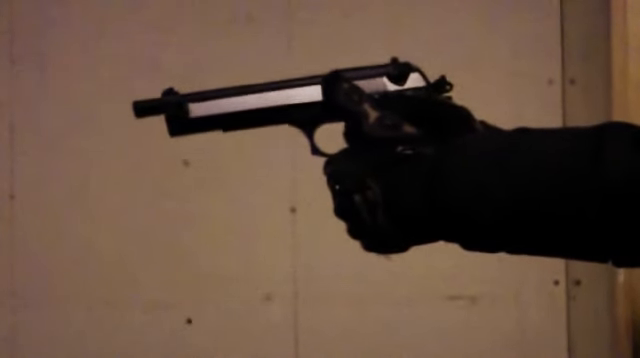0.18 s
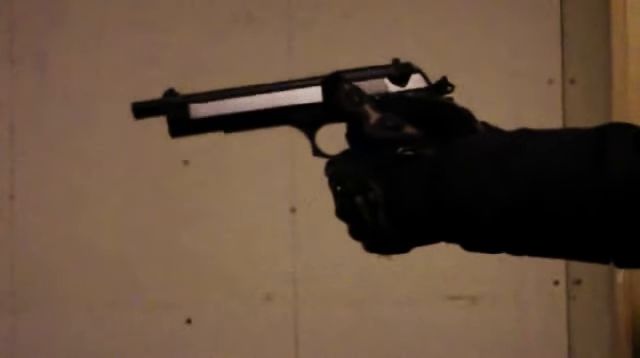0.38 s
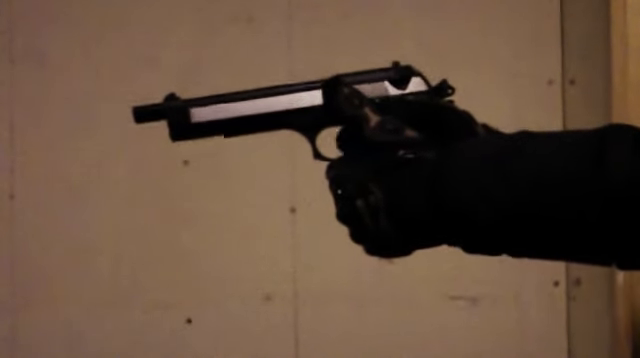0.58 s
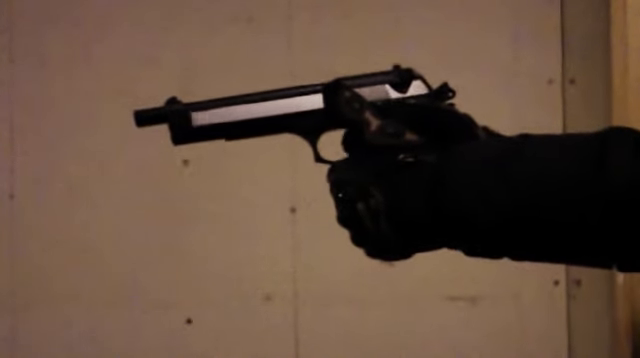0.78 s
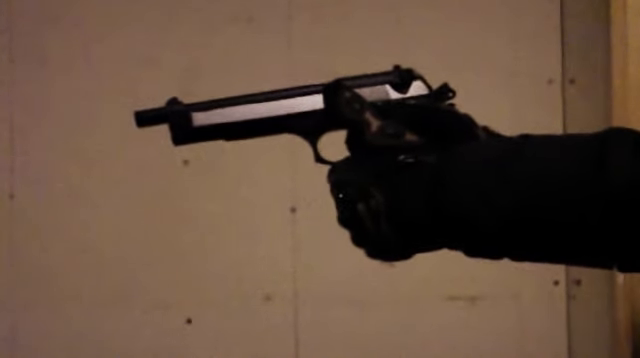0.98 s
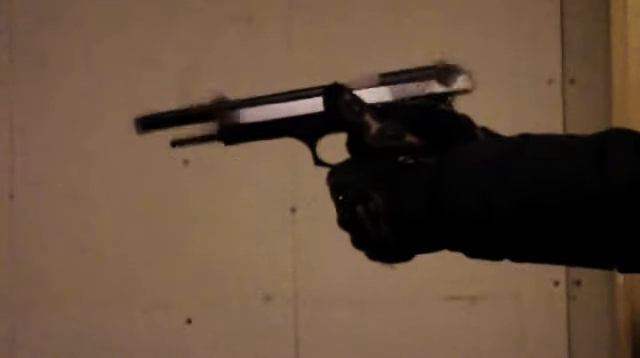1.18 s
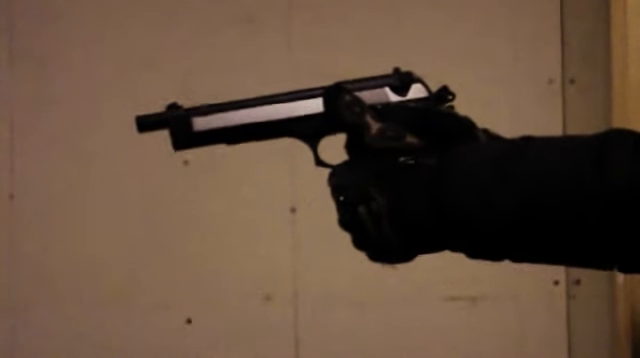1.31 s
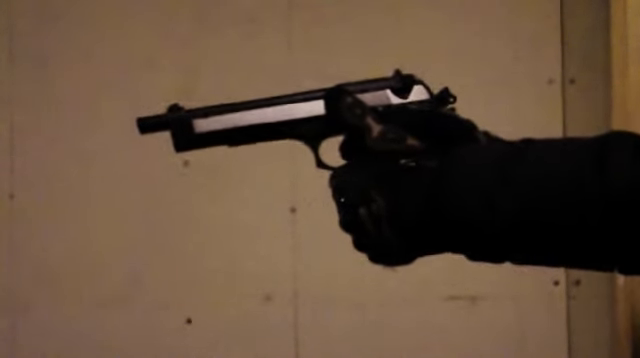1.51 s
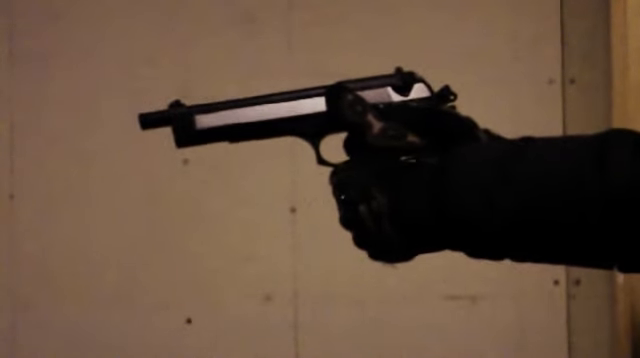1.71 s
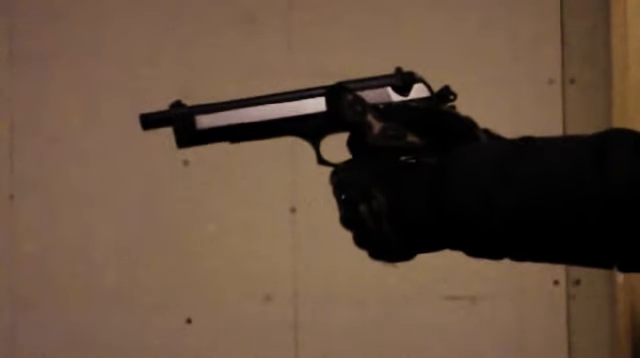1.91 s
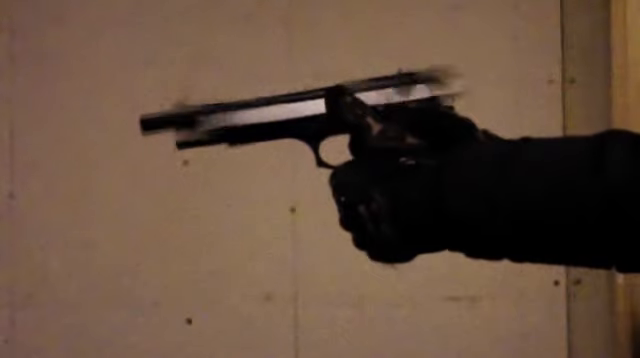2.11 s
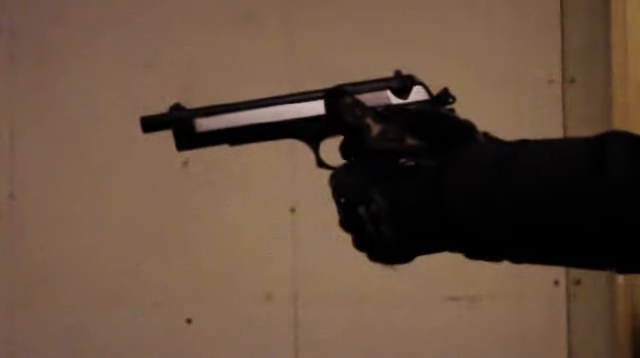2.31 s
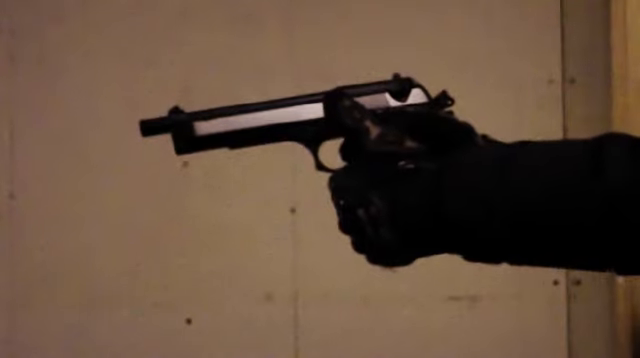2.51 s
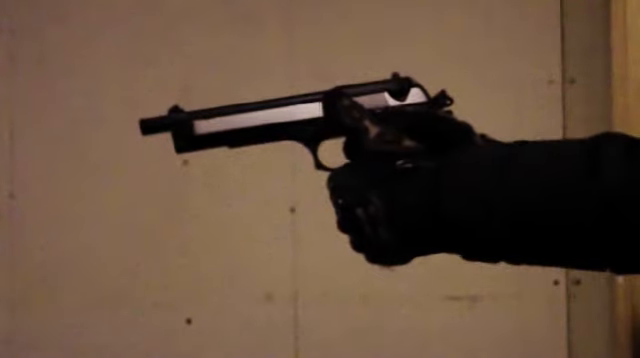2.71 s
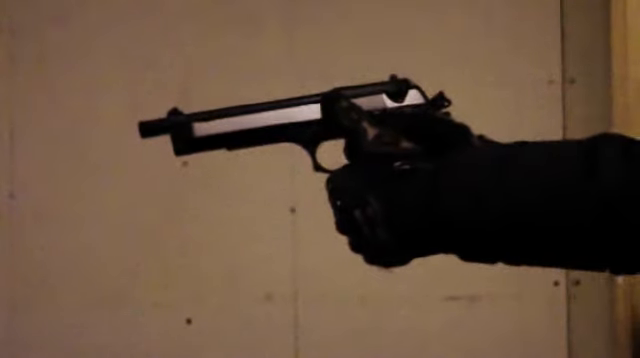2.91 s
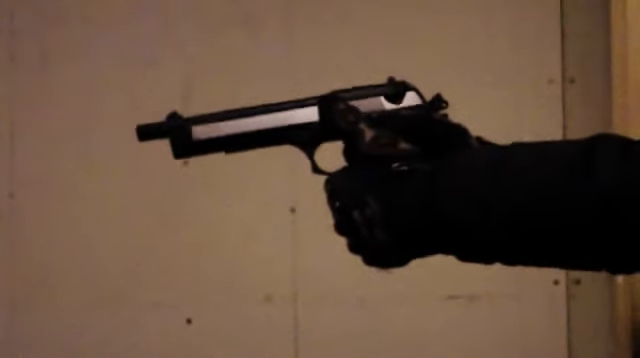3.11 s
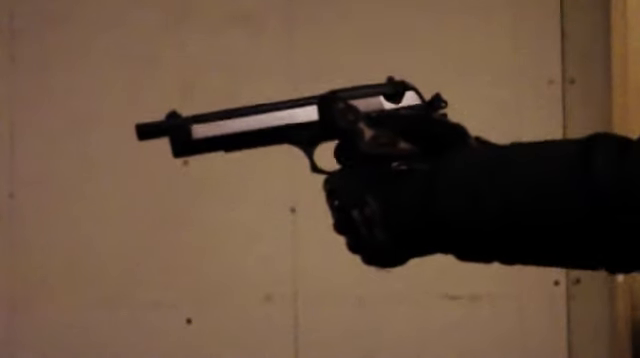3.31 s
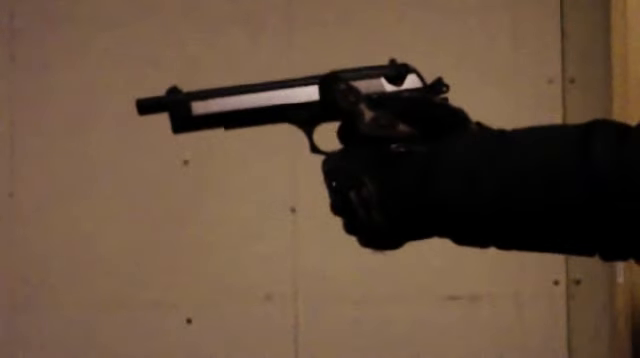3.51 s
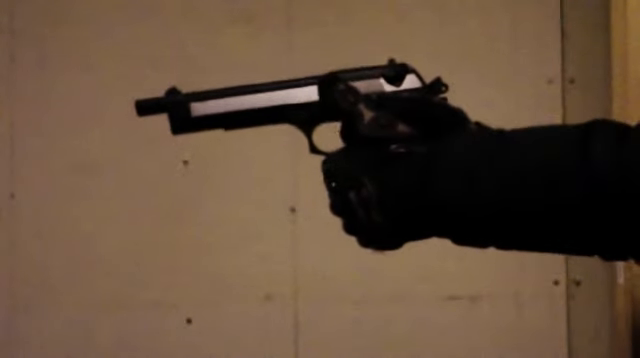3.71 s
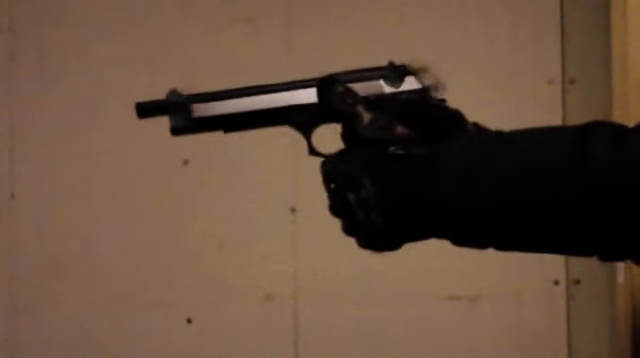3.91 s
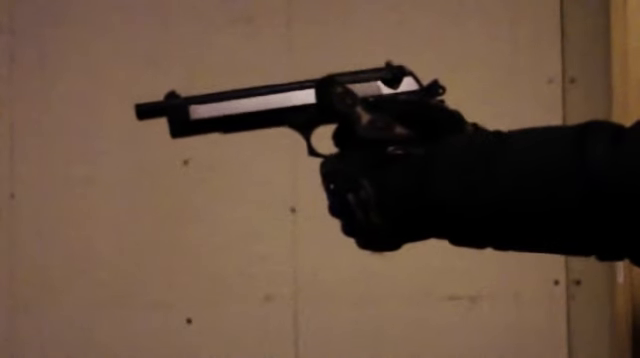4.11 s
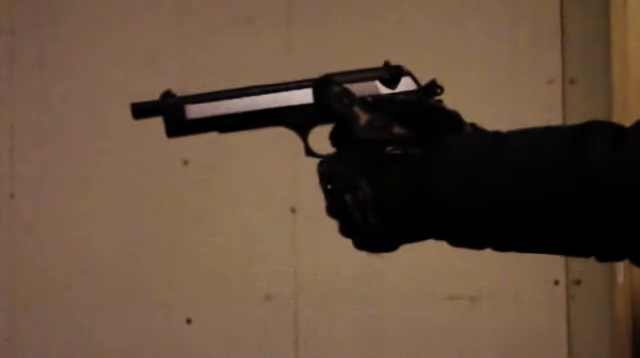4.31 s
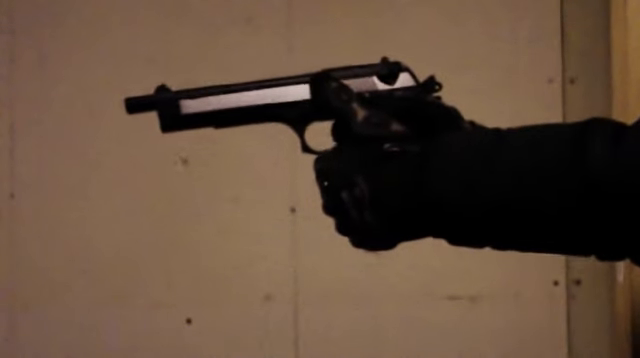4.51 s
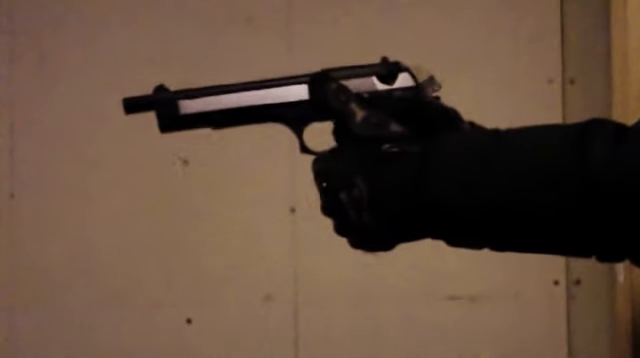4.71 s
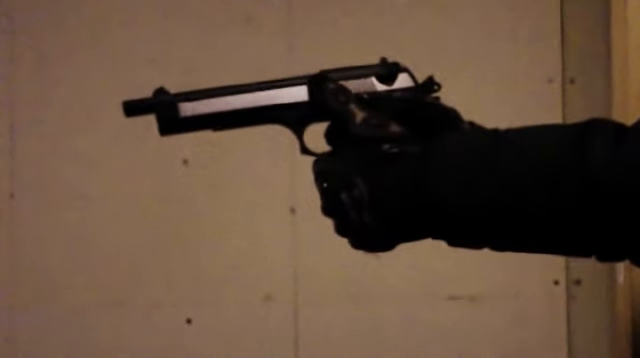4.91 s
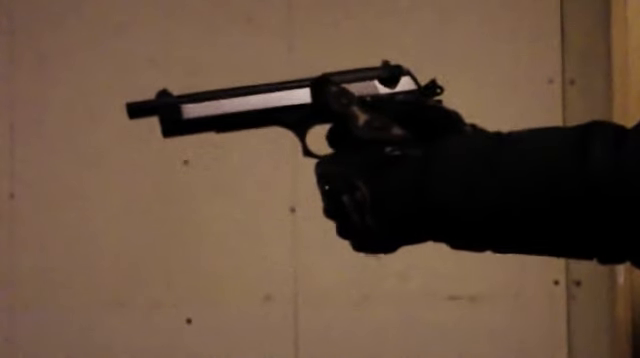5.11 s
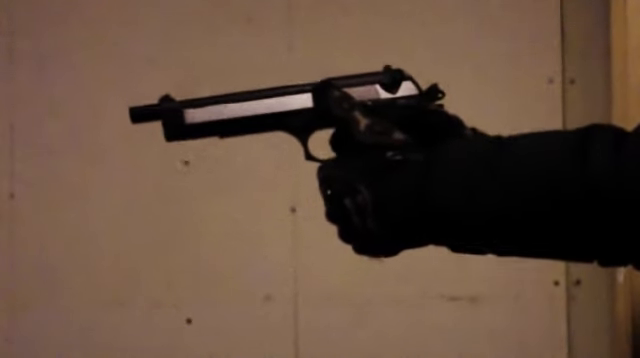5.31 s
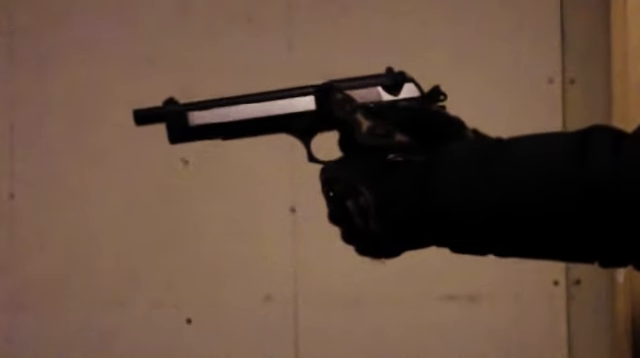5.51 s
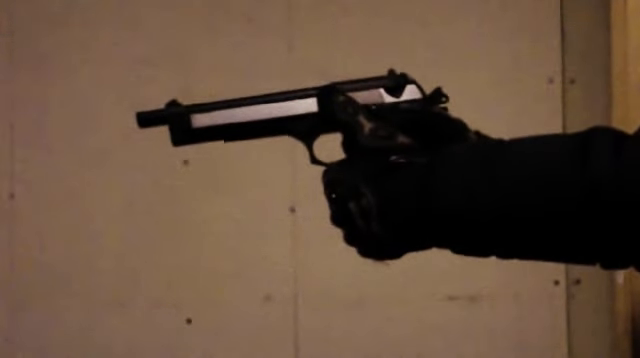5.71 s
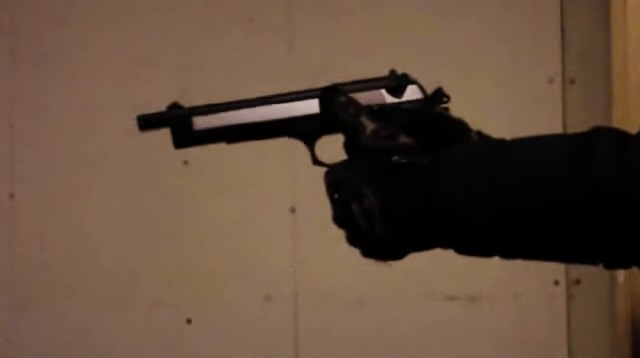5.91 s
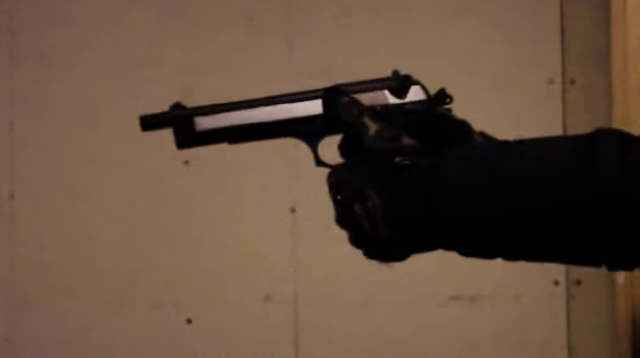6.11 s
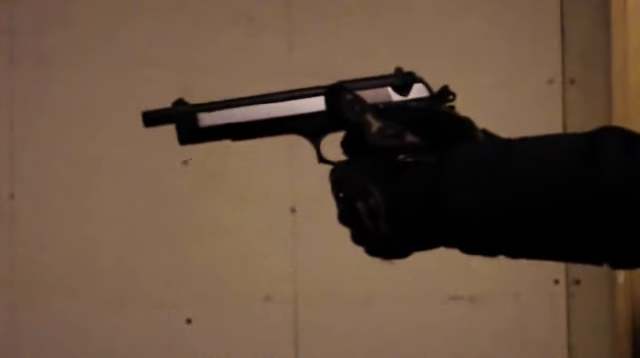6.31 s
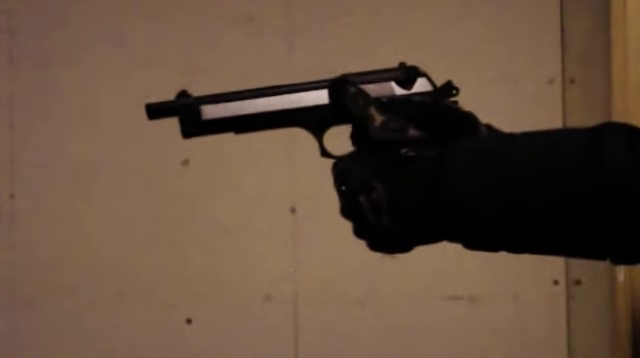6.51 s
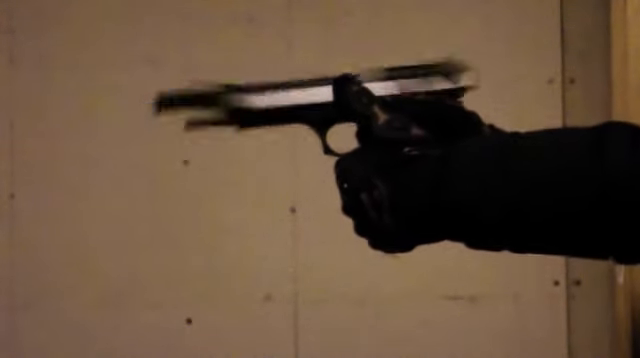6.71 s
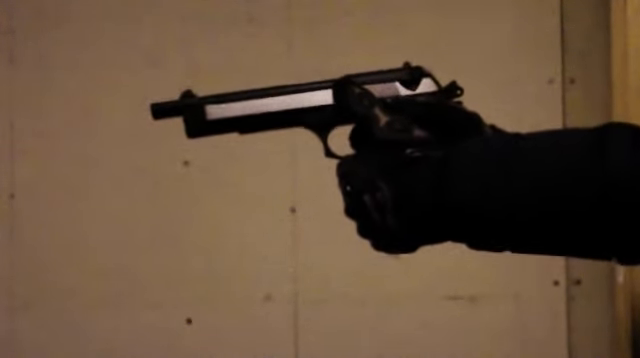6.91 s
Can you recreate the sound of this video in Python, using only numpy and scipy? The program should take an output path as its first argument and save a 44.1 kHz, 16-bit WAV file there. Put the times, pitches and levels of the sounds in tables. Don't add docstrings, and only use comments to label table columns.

```python
import sys
import numpy as np
from scipy import signal
from scipy.fft import rfft, irfft, next_fast_len
from scipy.io import wavfile
from scipy.ndimage import uniform_filter1d, map_coordinates

SR = 44100
rng = np.random.default_rng(int(sys.argv[2]) if len(sys.argv) > 2 else 0)


def how_loud(loudness_db):
    steps = np.asarray(loudness_db, float) / 20
    return 10 ** steps


def dump(signal):
    limited = np.clip(np.atleast_2d(signal).T, -1, 1)
    pcm = np.round(limited * 32767).astype(np.int16)
    wavfile.write(sys.argv[1], SR, pcm)


N = 307818


def unit(x):
    return x / np.sqrt(np.mean(x ** 2) + 1e-20)


def along(points, hz):
    point_hz, value = np.transpose(points)
    return np.interp(np.log(hz + 1), np.log(point_hz + 1), value)


def filtered(x, response):
    m = next_fast_len(len(x) + 8192)
    return irfft(rfft(x, m) * response(np.fft.rfftfreq(m, 1 / SR)), m)[:len(x)]


def noise(spectrum, count):
    white = rng.standard_normal(count)
    return unit(filtered(white, lambda hz: how_loud(along(spectrum, hz))))


def add(track, s, sound):
    part = track[max(round(s * SR), 0):][:len(sound)]
    part += sound[:len(part)]


def swelling_mode(t, hz, db, t60, swell):
    shape = how_loud(db - 60 * t / t60) * (1 - np.exp(-(t / swell) ** 2))
    return shape * np.sin(2 * np.pi * (hz * t + rng.random()))


# start_s, level_db
TRAFFIC = [
    (0, -70),
    (2.9, -70),
    (3.6, -60),
    (4.7, -57),
    (5.8, -61),
    (6.3, -64),
    (6.55, -51),
    (6.98, -55),
]
# pitch_hz, level_db per Hz
DRONE = [(25, -30), (38, -2), (55, 0), (64, -10), (80, -50)]


def far_engine():
    level_db = np.interp(np.arange(N) / SR, *np.transpose(TRAFFIC))
    return how_loud(level_db) * noise(DRONE, count=N)


def shot_times():
    return [-.45] + [row[0] for row in SHOTS]


# pitch_hz, level_db per Hz
RUMBLE = [(5.9, -33), (10, 3.5), (26, 4.5), (54, -9.5), (67, -14.5), (81, -30.5), (110, -25), (140, -61.5),
          (240, -120)]
RUMBLE_DB, RUMBLE_SWING_DB, RUMBLE_JOLT_DB, JOLT_S = -57, 1.5, 5, .2


def building_rumble():
    t = np.arange(SR * 3 // 2) / SR
    jolt = np.zeros(N + SR)
    for s in shot_times():
        add(jolt, 1 + s, t / JOLT_S * np.exp(1 - t / JOLT_S))
    wander = map_coordinates(rng.standard_normal(size=40), [np.arange(N) / SR * 5.5])
    level_db = RUMBLE_DB + RUMBLE_SWING_DB * wander + RUMBLE_JOLT_DB * jolt[SR:]
    return how_loud(level_db) * noise(RUMBLE, count=N)


# pitch_hz, level_db, t60_s, swell_s
STAND = [(9.5, -45, 1.6, .05), (19.5, -38, 2.2, .12), (33, -34, 1.0, .14)]


def stand():
    t = np.arange(SR * 3 // 2) / SR
    sway = np.zeros(N + SR)
    for s in shot_times():
        for hz, db, t60, swell in STAND:
            add(sway, 1 + s, swelling_mode(t, hz, db, t60, swell))
    return sway[SR:]


# pitch_hz, level_db per Hz
HISS = [(41, -28.5), (70, -4.5), (92, -17), (130, -13), (205, -17), (476, -21.5), (554, -17), (701, -25),
        (2020, -24), (3590, -35), (3900, -50), (5070, -100.5), (8580, -120)]


def preamp_hiss():
    return how_loud(-60) * noise(HISS, count=N)


# multiple of its turning rate, level_db
WHIRR = [(1, -5.5), (2, 2.5), (3, -3), (4, 0), (5, 0.5), (6, -20.5), (7, -2.5), (8, -2.5), (9, -8),
         (10, -32)]
SEEK_DB = [
    -63.5,
    -59.5,
    -70,
    -61.5,
    -62,
    -65,
    -70,
    -66,
    -61.5,
    -61,
]
SEEK_FIRST_S, SEEK_EVERY_S = .088, .6865


def storage_motor():
    out = np.zeros(N)
    t = np.arange(round(.105 * SR)) / SR
    gate = np.clip(np.minimum(t, t[-1] - t) / 0.014, 0, 1)
    for burst, db in enumerate(SEEK_DB):
        unsteady = unit(uniform_filter1d(rng.standard_normal(len(t)), size=700))
        turns = np.cumsum(378 + 4 * unsteady) / SR
        buzz = sum(how_loud(level) * np.sin(2 * np.pi * (k * turns + rng.random())) for k, level in WHIRR)
        whirr = unit(buzz) + 0.83 * noise(CLACK, count=len(t))
        add(out, SEEK_FIRST_S + burst * SEEK_EVERY_S, how_loud(db) * gate * whirr)
    return out


# pitch_hz, t60_s
ROOM = [(100, 0.58), (500, 0.28), (1500, 0.29), (3500, 0.32)]


def room(x, wet_db, far_db):
    hz, t, z = signal.stft(rng.standard_normal(SR * 3 // 4), SR, nperseg=256)
    near_fall = how_loud(-60 * t / along(ROOM, hz)[:, None])
    far_fall = how_loud(far_db - 60 * t / 1.1)
    tail = signal.istft(z * (near_fall + far_fall), SR, nperseg=256)[1]
    delayed = np.pad(x, (round(.004 * SR), 0))
    wet = signal.fftconvolve(delayed, tail / np.linalg.norm(tail))
    return np.pad(x, (0, len(wet) - len(x))) + how_loud(wet_db) * wet


# pitch_hz, level_db per Hz
CLACK = [(150, -27), (500, -9.5), (800, -4.5), (1100, -9.5), (1500, -11), (1880, -3.5), (2200, -2.5),
         (2600, -2.5), (3100, -11), (3800, -17)]
# pitch_hz, width_hz, lift_db
SLIDE = [(1220, 60, 5), (1640, 40, 5), (1880, 45, 7), (2200, 45, 8), (2465, 35, 7), (2700, 45, 6)]


def clatter(db, t60, rise, spectrum=CLACK, metal=1):
    t = np.arange(SR // 5) / SR
    grain = how_loud(1.4 * unit(uniform_filter1d(rng.standard_normal(len(t)), size=60)))
    attack = np.clip(t / max(rise, 1e-4), 0, 1) ** 2
    decay = how_loud(-60 * np.maximum(t - rise, 0) / max(t60, .005))

    def lift(hz):
        peaks = [lift_db / (1 + (2 * (hz - c) / width) ** 2) for c, width, lift_db in SLIDE]
        return how_loud(metal * sum(peaks))

    burst = unit(filtered(grain * noise(spectrum, count=len(t)), lift))
    return how_loud(db) * attack * decay * burst


# pitch_hz, level_db per Hz
TICK = [(200, -30), (600, -12), (1200, -12.5), (1800, -4.5), (2300, 2), (2900, -3.5), (3500, -9),
        (3900, -13.5), (4500, -38)]
# pitch_hz, level_db per Hz
THUD = [(100, -29), (200, -13), (400, -7.5), (650, -1), (1000, -12.5), (1600, -30.5), (4000, -79.5)]
# start_s, level_db (peak), thud_db (over the peak)
PELLETS = [(0.0024, -37.5, -7), (0.0915, -41, -9.5), (0.598, -29, -9), (1.8632, -30.5, -6),
           (2.6364, -55, -2), (3.015, -40, -1.5), (3.0494, -47.5, -9), (3.4563, -23.5, -14),
           (3.4776, -34.5, -10), (3.6709, -27, -7.5), (4.336, -33, -15.5), (4.3694, -39.5, -11.5),
           (4.4097, -47, -6), (4.5992, -37.5, -11)]
RATTLE_T60_S, RATTLE_S_PER_DB = .07, .004


def pellets():
    out = np.zeros(N)
    for s, db, thud_db in PELLETS:
        t60 = RATTLE_T60_S + RATTLE_S_PER_DB * max(-25 - db, 0)
        tick = clatter(db - 9, t60, rise=0.0045, spectrum=TICK, metal=0)
        knock = clatter(db + thud_db - 6.5, t60, rise=.006, spectrum=THUD, metal=0)
        add(out, s - .003, room(tick + knock, wet_db=-2.5, far_db=-29))
    return out


# pitch_hz, level_db, t60_s, swell_s
BOARD = [(125, -34, .1, .003), (172, -23.5, .11, .004), (327, -15.5, .15, .027), (377, -11.5, .17, .027)]


def panels(db):
    t = np.arange(SR // 4) / SR
    return sum(swelling_mode(t, hz, db + level_db, t60, swell) for hz, level_db, t60, swell in BOARD)


# pitch_hz, level_db, t60_s, swing direction
FRAME = [(90, -20, .08, 1), (172, -14, .09, 1), (300, -6, .04, 1), (327, -14, .09, 1), (377, -11, .13, 1),
         (451, -16, .08, -1), (562, 0, .095, -1), (638, 0, .095, -1), (770, -18, .08, 1),
         (833, -14, .07, 1), (1150, -20, .05, -1)]


def ring(db, spread_db):
    t = np.arange(SR // 5) / SR
    modes = 0
    for hz, level, t60, way in FRAME:
        level_db = level + spread_db * rng.normal() - 60 * t / t60
        modes = modes + how_loud(level_db) * np.sign(way) * np.sin(2 * np.pi * hz * t)
    return how_loud(db) * modes * (1 - np.exp(-t / 0.0015))


# pitch_hz, level_db per Hz
LEAD_IN = [(500, -37), (1300, -14), (1900, 0), (2400, -3), (3000, -19), (4000, -51.5)]
# start_s (slide at its rear stop), crack_db, hiss_t60_s, slam_db, homing_db
SHOTS = [
    (.4546, -5.5, .045, -3.5, -12),
    (1.3461, -5, .04, -4, -12.5),
    (2.2939, -5.5, .04, -2.5, -9.5),
    (3.1891, -7.5, .075, -2, -17),
    (4.1316, -4.5, .07, -2.5, -9.5),
    (4.9399, -6, .045, -1.5, -8),
    (5.9735, -8, .085, -3, -13),
    (6.8746, -7.5, .055, -4.5, -12),
]
# start_s (after the rear stop), clatter_db, ring_db
LATER_KNOCKS = [
    (.050, -14, -7),
    (.052, -17, -16),
    (.057, -16, -18),
    (.056, -21, -30),
    (.052, -19, -28),
    (.0485, -15, -6),
    (.0395, -13, -1),
    (.037, -14, -3),
]
RECOIL_S, SWELL_S, HAMMER_DB = .0106, .003, -17
RETURN_S, CHATTER_S, CHATTER_DB = .0275, .0034, -1
CLACK_DB, HOME_RING_DB = -15.5, -6
HOME_T60_S, LATER_KNOCK_T60_S = .08, .105


def pistol():
    out = np.zeros(N)
    lead = .02
    stop = lead + RECOIL_S
    for (stop_s, db, hiss_t60, slam_db, home_db), later_knock in zip(SHOTS, LATER_KNOCKS):
        bright, body = np.zeros(SR // 3), np.zeros(SR // 3)
        add(bright, lead - .014, clatter(db - 43, t60=0.041, rise=0.0017, spectrum=LEAD_IN))
        add(bright, lead - SWELL_S - .004, clatter(db + HAMMER_DB, t60=0.051, rise=0.0065))
        add(bright, lead + 0.001022 - SWELL_S, clatter(db - 5.5, hiss_t60, rise=SWELL_S))
        add(body, lead - SWELL_S, clatter(db - 12.5, t60=.06, rise=0.0024, spectrum=THUD, metal=0))
        blow = ring(slam_db - 8.5, spread_db=0.74)
        add(body, stop, blow)
        add(body, stop + CHATTER_S, how_loud(CHATTER_DB) * blow)
        add(body, stop, panels(slam_db))
        add(bright, stop, clatter(slam_db + CLACK_DB - 1.5, t60=.05, rise=0.0045))
        homing = (RETURN_S, home_db, home_db + HOME_RING_DB, HOME_T60_S)
        for s, level_db, ring_db, life in [homing, (*later_knock, LATER_KNOCK_T60_S)]:
            add(bright, stop + s - .001, clatter(level_db - 5.5, 1.5 * life, rise=.004, metal=0.66))
            add(body, stop + s, ring(ring_db - 13, spread_db=2))
        heard = room(bright, wet_db=-4.5, far_db=-34) + room(body, wet_db=-10.5, far_db=-28.5)
        add(out, stop_s - stop, heard)
    return out


def scene():
    background = far_engine() + building_rumble() + stand() + preamp_hiss() + storage_motor()
    return (background + pellets() + pistol())[None]


# pitch_hz, level_db
MUTE = [(3000, -118), (3600, -103), (4000, -95.5), (4500, -103), (5000, -118), (7000, -112), (8000, -103),
        (9000, -112), (11000, -108), (11700, -97.5), (12100, -90.5), (12600, -101), (13500, -92)]


def squelch(x):
    hz, _, z = signal.stft(x, SR, nperseg=1024)
    power = np.mean(np.abs(z[:512].reshape(128, 4, -1)) ** 2, axis=1)
    band = np.repeat(power, 4, axis=0)
    loudness = 1 + np.sqrt(band[64:].mean(axis=0)) / how_loud(-86)
    threshold = how_loud(2 * along(MUTE, hz[:512]))[:, None] * loudness
    over = band / threshold
    z[:512] *= over ** 6 / (1 + over ** 6)
    return signal.istft(z, SR, nperseg=1024)[1][:len(x)]


def sample_and_hold(x):
    step = SR / 8012.5
    return map_coordinates(x, [np.floor(np.arange(N) / step) * step])


def band_limit(x):
    return signal.sosfilt(signal.butter(12, 13200, fs=SR, output="sos"), x)


def record(dry):
    x = filtered(dry[0], lambda hz: 1 / (1 + (hz / 3850) ** 24))
    x = x / (1 + np.abs(x / .9) ** 4) ** (1 / 4)
    held = filtered(sample_and_hold(x), lambda hz: 1 / (1 + (hz / 12850) ** 150))
    return band_limit(squelch(held)[None])


dry = scene()
out = record(dry)
dump(out)
```